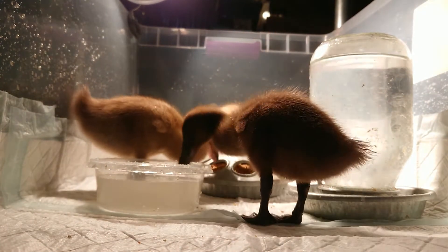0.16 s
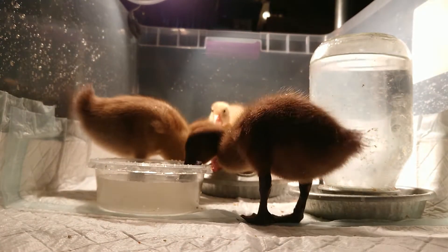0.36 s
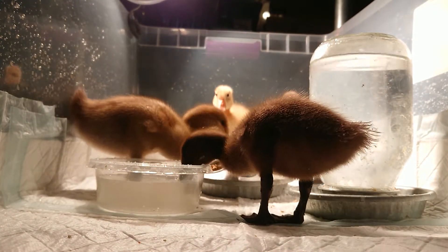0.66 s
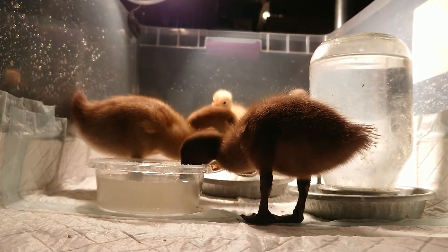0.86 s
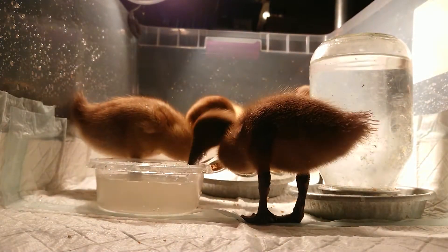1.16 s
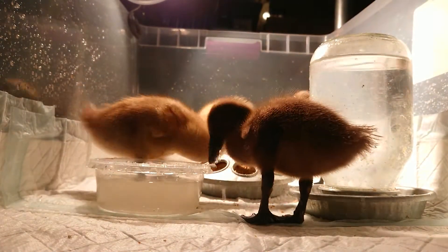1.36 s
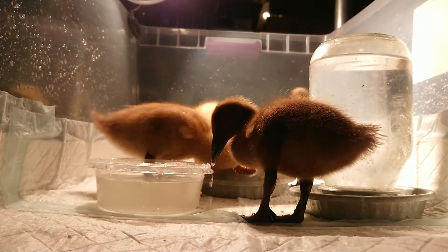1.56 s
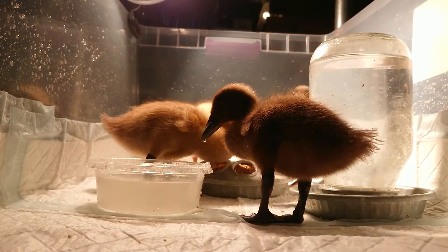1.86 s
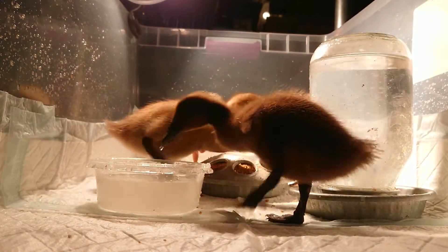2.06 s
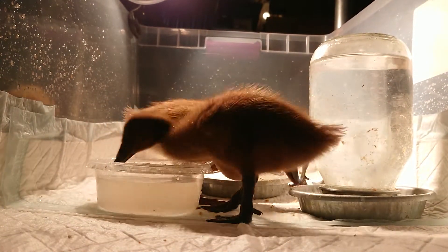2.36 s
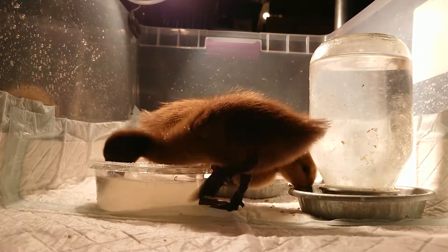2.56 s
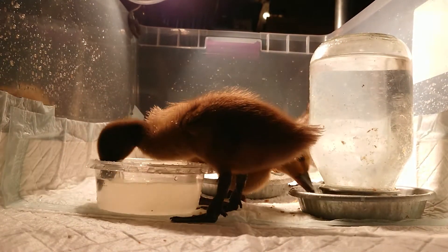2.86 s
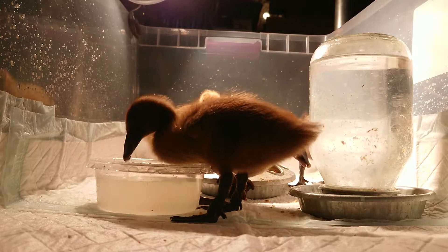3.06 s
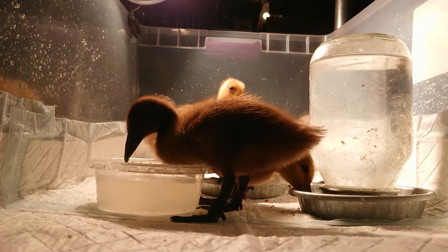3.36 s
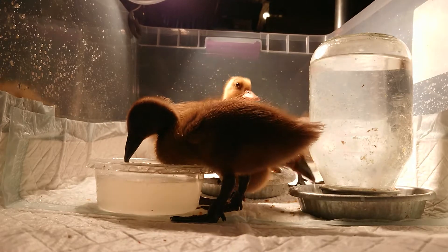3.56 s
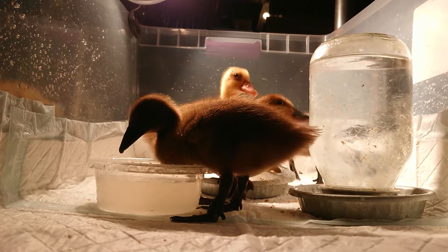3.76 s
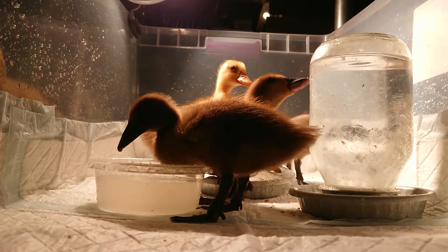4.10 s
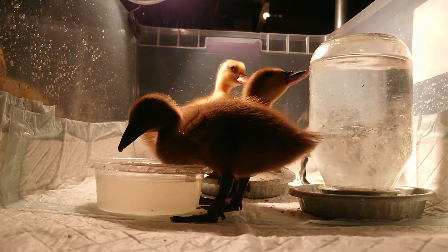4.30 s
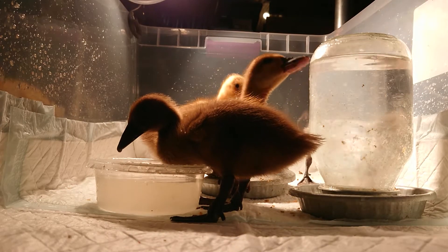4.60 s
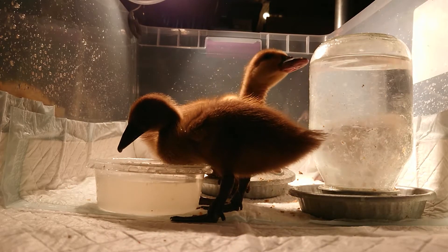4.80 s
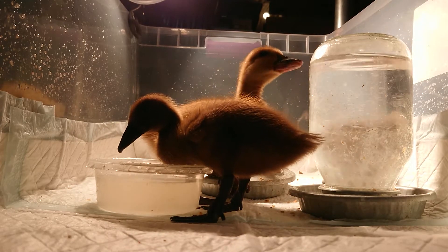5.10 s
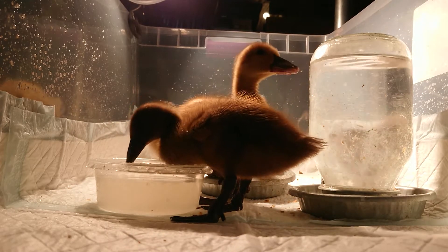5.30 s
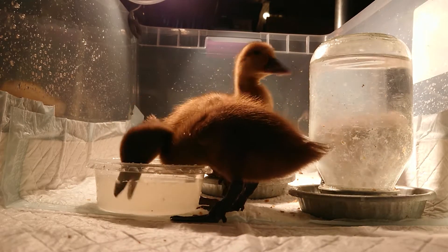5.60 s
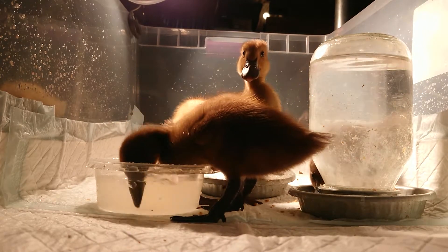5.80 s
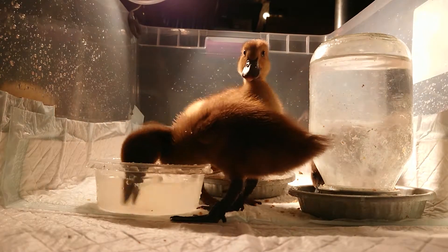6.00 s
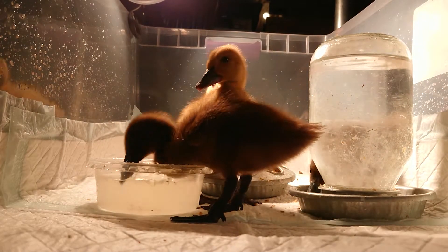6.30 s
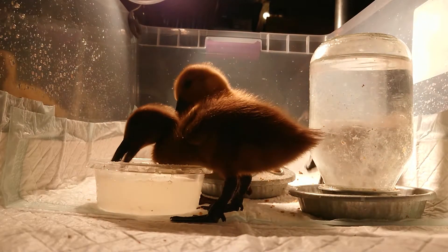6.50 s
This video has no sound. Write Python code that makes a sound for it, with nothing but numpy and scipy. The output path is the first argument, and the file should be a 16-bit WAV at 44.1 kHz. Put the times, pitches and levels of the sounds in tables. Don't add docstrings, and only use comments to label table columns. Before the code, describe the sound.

Ducklings peep brightly in a small plastic tub, the microphone on its floor. Brief arched whistles come in loose clusters from several birds, echoed tightly by the walls. Feet thump softly and rustle paper pads. A hard knock on the dish sounds early, then water ticks and light splashes; peeping continues over sparser movement until a bill dabbles loudly in water near the end.

```python
import sys
import numpy as np
from scipy import signal
from scipy.io import wavfile

SR = 44100
rng = np.random.default_rng(int(sys.argv[2]) if len(sys.argv) > 2 else 0)


def master_out(mix):
    frames = np.transpose(np.atleast_2d(mix))
    ceiling = np.clip(frames, -1, 1)
    pcm = np.round(ceiling * 32767).astype(np.int16)
    wavfile.write(sys.argv[1], SR, pcm)


def ratio_of_db(decibels):
    return 10 ** (np.asarray(decibels, float) / 20)


N = 293265


def seconds(length):
    return np.arange(round(length * SR)) / SR


def evened(x):
    return x / np.sqrt(np.mean(x ** 2) + 1e-20)


def smooth_chance(shape, size):
    return evened(signal.fftconvolve(rng.standard_normal(shape), np.ones(size), "same"))


def read(points, hz):
    f, value = np.transpose(points)
    return np.interp(np.log(hz + 1), np.log(f + 1), value)


def band(x, lo_hz, hi_hz, order=2):
    return signal.sosfilt(signal.butter(order, [lo_hz, hi_hz], "band", fs=SR, output="sos"), x)


def panned(pan_db):
    return ratio_of_db(np.array([pan_db / 2, -pan_db / 2]))


def add(mix, s, sound):
    part = mix[..., round(s * SR):][..., :sound.shape[-1]]
    part += sound[..., :part.shape[-1]]


def coloured(pair, shape, patchy_db, size):
    # frequency in Hz, left-right likeness from -1 to 1.
    likeness = [(60, 0.98), (180, 0.79), (550, 0.47), (1650, -0.35), (4970, -0.24), (15000, 0.0099)]
    # frequency in Hz, left minus right in dB.
    lean = [(60, -5.5), (150, -4), (380, -6.5), (950, -5.5), (2380, -1.5), (5980, -4), (15000, 6.5)]
    hz, _, (a, b) = signal.stft(pair, SR, nperseg=size)
    same = np.clip(read(likeness, hz), -1, 1)[:, None]
    z = np.array([a, same * a + np.sqrt(1 - same ** 2) * b])
    z *= ratio_of_db(read(shape, hz)[:, None] + patchy_db * smooth_chance(a.shape, size=(6, 5)))
    z *= panned(read(lean, hz))[:, :, None]
    return evened(signal.istft(z, SR, nperseg=size)[1][:, :N])


def tail(t60, start):
    t = seconds(.25)
    taps = rng.standard_normal((2, len(t))) * ratio_of_db(-60 * t / t60) * (t > start)
    return taps / np.linalg.norm(taps[0])


def bustle(axis):
    # middle in seconds, length in seconds, rustle in dB, floor tremor in dB.
    bouts = [(0.125, 0.36, -63, -49.5), (0.41, 0.12, -67, -46), (0.484, 0.11, -67, -40),
             (0.714, 0.5, -70.5, -52.5), (1.212, 0.2, -66.5, -51.5), (1.402, 0.15, -63, -47.5),
             (1.59, 0.32, -68, -41.5), (1.844, 0.086, -70, -52), (2.087, 0.095, -71, -56),
             (2.24, 0.35, -76, -52.5), (2.577, 0.2, -64, -43.5), (2.63, 0.1, -57.5, -51),
             (2.743, 0.23, -60.5, -45), (3.023, 0.31, -66.5, -59), (3.243, 0.038, -65, -45),
             (3.475, 0.29, -69, -47.5), (3.75, 0.22, -75, -50.5), (4.08, 0.11, -69.5, -43.5),
             (4.295, 0.06, -69.5, -73), (4.42, 0.095, -80, -47.5), (4.663, 0.071, -75, -47),
             (4.924, 0.19, -97, -49.5), (5.087, 0.22, -77.5, -57), (5.411, 0.25, -66, -47),
             (5.82, 0.25, -62, -47), (5.963, .12, -60.5, -49), (6.173, 0.2, -57, -51.5),
             (6.617, 0.39, -62, -48)]
    rest_db = (-85.5, -55.5)[axis]
    t, power = np.arange(0, N, 64) / SR, ratio_of_db(rest_db) ** 2
    for s, length, *db in bouts:
        power = power + ratio_of_db(db[axis]) ** 2 * np.exp(-(2 * (t - s) / length) ** 2 * 2.19)
    return np.interp(np.arange(N) / SR, t, np.sqrt(power))


def air():
    # frequency in Hz, level in dB per Hz.
    air_spectrum = [(150, -25.5), (250, -4.5), (292, -2), (482, -6), (544, -13), (681, -10), (1120, -9.5),
                    (1760, -7), (2250, -16.5), (3170, -20), (4640, -21.5), (6440, -28), (13100, -22.5),
                    (14500, -22), (15600, -36.5)]
    return ratio_of_db(-67) * coloured(rng.standard_normal((2, N)), air_spectrum, patchy_db=3.5, size=1024)


def pads():
    # frequency in Hz, rustle in dB per Hz.
    rustle_spectrum = [(530, -23), (900, -7.5), (1260, -5), (1980, 0.5), (2900, -2), (3900, -4),
                       (4240, -3.5), (5380, -9), (6440, -19), (9320, -22), (13200, -18.5), (15600, -32)]
    # frequency in Hz, tremor in dB per Hz.
    tremor_spectrum = [(24, -51), (40, 6), (108, 7), (333, -18), (371, -18), (483, -14), (531, -22.5),
                       (614, -14.5), (700, -14), (910, -34), (1540, -120)]
    snaps_per_s = 3200
    clumps = ratio_of_db(2.8 * smooth_chance(N, size=500))
    snaps = ratio_of_db(3.1 * np.minimum(rng.exponential(1, (2, N)), 5))
    snaps *= rng.random((2, N)) < snaps_per_s / SR
    fibres = evened(snaps * rng.choice([-1, 1], (2, N)))
    fibres = (fibres + 0.88 * rng.standard_normal((2, N))) * clumps
    rustle = coloured(fibres, rustle_spectrum, patchy_db=4., size=256)
    lumps = ratio_of_db(2.5 * smooth_chance(N, size=1200))
    tremor = coloured(rng.standard_normal((2, N)) * lumps, tremor_spectrum, patchy_db=2., size=4096)
    return rustle * ratio_of_db(10.5) * bustle(axis=0) + tremor * ratio_of_db(1.5) * bustle(axis=1)


def droplets():
    out, t = np.zeros((2, N)), seconds(.03)
    drops_per_s = 400
    size = ratio_of_db(3.9 * np.minimum(rng.exponential(1, N), 3)) * (rng.random(N) < drops_per_s / SR)
    kind = rng.integers(0, 16, N)
    for k, hz in enumerate(np.geomspace(1300., 5200., num=16)):
        ring = np.sin(2 * np.pi * hz * t * (1 + 2.5 * t))
        drop = ring * np.exp(-hz * t / 9.) * (1 - np.exp(-t / .0007))
        place = panned(rng.uniform(-9.0, 6.6))[:, None]
        out += place * signal.oaconvolve(size * (kind == k), drop)[:N]
    return evened(out) * ratio_of_db(-5.0) * bustle(axis=0)


def wet_ticks():
    # start in seconds, peak in dB, pitch in Hz.
    tick_events = [(.318, -54, 3600), (.697, -34.5, 3160), (.901, -51, 4280), (1.268, -38, 3080),
                   (1.225, -42, 3580), (5.712, -37.5, 3620), (2.511, -47, 1800), (2.5516, -43.5, 4220),
                   (2.578, -40, 3600), (2.597, -45, 4600), (2.6209, -41, 3200), (2.638, -36, 4570),
                   (2.655, -37, 2700), (2.6893, -48, 3690), (2.7028, -43, 3300), (2.737, -36, 1710),
                   (2.754, -44, 4300), (2.7716, -42.5, 3020), (2.801, -46, 5300), (2.872, -34, 3860),
                   (3.492, -42, 3500), (5.7826, -40.5, 1640), (5.838, -48.5, 5900), (5.9383, -50, 4200),
                   (6.027, -39, 4700), (6.081, -36, 1670), (6.087, -36, 2380), (6.141, -29.5, 4730),
                   (6.1695, -32, 2160), (6.204, -32, 4210), (6.212, -35, 3090), (6.2503, -41.5, 2940)]
    t60, spread = 0.024, 0.156
    out, t = np.zeros(N), seconds(.04)
    for chance, (s, db, hz) in zip(rng.uniform(-1, 1, (len(tick_events), 3)), tick_events):
        notes = hz * (1 + spread * np.array([0, -1, 1.3]) * (1 + 0.41 * chance))
        ring = np.sin(2 * np.pi * notes[:, None] * t).sum(0)
        add(out, s, ratio_of_db(db - 6.0 - 60 * t / t60) * ring * np.minimum(t / 0.00069, 1))
    echoes = signal.oaconvolve(out[None], tail(t60=0.045, start=0.0018), axes=1)[:, :N]
    return out * panned(-2.2)[:, None] + ratio_of_db(-5.0) * echoes


def jar():
    # start in seconds, peak in dB.
    jar_taps = [
        (2.495, -44),
        (2.7851, -47),
        (3.357, -50.5),
        (3.382, -55),
    ]
    # start in seconds, peak in dB, pitch in Hz.
    pings = [
        (1.2, -45.5, 3520),
        (2.456, -55, 3560),
        (3.506, -50, 4300),
        (3.762, -56, 3650),
    ]
    jar_hz = 1870
    out, t = np.zeros(N), seconds(.2)
    for s, db in jar_taps:
        add(out, s, ratio_of_db(db - 60 * t / 0.093) * np.sin(2 * np.pi * jar_hz * t) * np.minimum(t / 0.0017, 1))
    for s, db, hz in pings:
        add(out, s, ratio_of_db(db - 60 * t / 0.044) * np.sin(2 * np.pi * hz * t) * np.minimum(t / 0.00082, 1))
    return out


def clicks():
    # start in seconds, peak
    # in dB, t60 in seconds.
    bill_clicks = [(.16, -62, .098), (0.2, -37.5, 0.048), (0.699, -46.5, 0.06), (1.268, -38.5, 0.039),
                   (1.4657, -43, 0.1), (2.707, -43, 0.12), (2.719, -41, 0.12), (2.853, -45, 0.11),
                   (2.8649, -36, 0.11), (2.9058, -40.5, 0.055), (3.9752, -52, 0.061), (4.1372, -50, 0.096),
                   (4.208, -50, .044), (5.553, -50, 0.39), (6.0123, -34.5, 0.12), (6.134, -25.5, 0.061),
                   (6.3247, -36.5, 0.071), (6.4676, -47, 0.21), (6.5172, -38, 0.049), (6.614, -38.5, 0.083),
                   (6.463, -58, 0.041)]
    # start in seconds, peak in
    # dB.
    pad_snaps = [(0.435, -39), (0.4797, -51), (0.498, -30), (1.222, -42), (2.0918, -45.5), (2.508, -53),
                 (2.799, -58), (3.4195, -41.5), (3.7913, -57.5), (4.2373, -52), (4.8376, -54.5),
                 (4.9746, -57), (5.2603, -55.5), (5.318, -42.5), (5.3524, -43.5), (5.4782, -44.5),
                 (5.7108, -43.5), (5.8745, -37.5), (6.0808, -41.5), (6.1703, -37), (6.397, -43),
                 (6.579, -52)]
    # start in seconds, peak
    # in dB, part above 6 kHz in dB relative to the peak.
    splashes = [(1.158, -66, -23), (1.546, -39.5, -18), (1.5826, -37.5, -19.5), (1.7416, -53.5, -22),
                (2.0187, -51.5, -20), (2.1332, -39.5, -13.5), (2.3103, -47, -17), (2.391, -40, -10),
                (2.5503, -54, 5), (2.6227, -39, -11), (3.48, -43.5, -12), (4.6462, -49, -8),
                (5.382, -42, -12.5), (6.1948, -32.5, -11.5)]
    hits = [(s, db, -26, t60) for s, db, t60 in bill_clicks]
    hits += [(s, db, bright_db, 0.12) for s, db, bright_db in splashes]
    hits += [(s, db, -15.5, 0.054) for s, db in pad_snaps]
    strength, ticks, t = np.zeros((2, N)), np.zeros((2, N)), seconds(.14)
    for s, db, bright_db, t60 in hits:
        decay = ratio_of_db(-60 * t / max(t60, .01)) + ratio_of_db(-14.5 - 60 * t / 0.011)
        add(strength, s, ratio_of_db([[db - 4.5], [db + bright_db - 8.0]]) * decay)
        add(ticks, s, ratio_of_db([[db + 12.5], [db + bright_db - 17]]))
    noise = rng.standard_normal((3, N)) * ratio_of_db(1.26 * smooth_chance(N, size=130))
    noise = noise[0] + 2.0 * noise[1:]
    body = band(noise * strength[0] + ticks[0], 1460, 4890, order=4) * panned(-2.8)[:, None]
    bright = band(noise * strength[1] + ticks[1], 6200, 15000) * panned(2.0)[:, None]
    return body + bright


def knocks():
    # start in seconds, thud peak in dB, dish pitch in Hz, floor pitch in Hz,
    # rattle in dB.
    footfalls = [(.418, -39.5, 259, 120, -7.5), (.737, -50, 336, 151, -13), (1.261, -37.5, 195, 125, -24.5),
                 (1.367, -44, 253, 110, -24), (1.506, -36.5, 110, 92, -28), (1.592, -35, 230, 109, -26),
                 (1.647, -34, 198, 144.6, -22), (5.763, -41.5, 190, 165, -25), (2.101, -46, 254, 120, -15),
                 (2.424, -47.5, 287, 135, -11), (2.553, -48, 363, 110, -17), (2.635, -45, 266, 113, -17),
                 (2.73, -45.5, 253, 108, -18), (3.549, -39.5, 277, 193, -17),
                 (3.727, -46.5, 245, 110, -17.5), (3.903, -46, 430, 160, -17),
                 (4.036, -43.5, 252, 112, -13.5), (4.365, -48.5, 220, 139.6, -11.5),
                 (4.812, -43.5, 252, 116, -16), (5.152, -38.5, 415, 112, -20), (5.743, -30, 170, 149, -17),
                 (6.584, -46, 287, 110, -21)]
    # start in seconds, peak in dB, dish pitch in Hz.
    dish_knocks = [(.203, -52, 656), (.365, -50.5, 483), (.477, -45, 378), (1.454, -36.5, 614),
                   (1.462, -37, 640), (1.476, -44, 626), (1.489, -49, 654), (1.607, -43, 660),
                   (1.569, -21, 617), (1.648, -33, 324), (1.652, -39, 930), (1.739, -46, 325),
                   (2.49, -33.5, 713), (2.782, -47.5, 610), (3.242, -44, 450), (3.357, -38.5, 673),
                   (4.287, -40.5, 563), (4.718, -43, 668), (4.888, -34.5, 344), (5.318, -54, 343),
                   (5.356, -44, 475), (5.426, -26.5, 435), (5.873, -47, 480), (5.936, -45, 672),
                   (6.056, -36, 439), (6.395, -53.5, 410)]
    # start in seconds, peak in dB, pitch in Hz.
    rim_taps = [
        (2.947, -56, 456),
        (4.161, -39, 543),
        (6.13, -48, 330),
    ]
    step_ring_db = -1.5
    rim_hz, rim_db, rim_t60 = 628, -20, .16

    blows = [(s, db + step_ring_db, hz, -step_ring_db, low_hz, rattle_db)
             for s, db, hz, low_hz, rattle_db in footfalls]
    blows += [(s, db, hz, -26, 135, -9.5) for s, db, hz in rim_taps]
    blows += [(s, db, hz, -42 + .55 * (db + 33.5) - db, 140, -11.5) for s, db, hz in dish_knocks]

    out, t = np.zeros((2, N)), seconds(.16)
    grit = evened(band(rng.standard_normal((2, N + len(t))), 227, 833))
    shake = evened(band(rng.standard_normal(N + len(t)), 49.4, 250))
    soft = 1 - np.exp(-t / 0.0034)
    for s, db, hz, thud_db, low_hz, rattle_db in blows:
        now = slice(round(s * SR), round(s * SR) + len(t))
        dish = np.sin(2 * np.pi * hz * t) * ratio_of_db(-60 * t / 0.038)
        ring_db = rim_db - 5.2 * abs(np.log2(hz / rim_hz))
        dish = dish + np.sin(2 * np.pi * rim_hz * t) * ratio_of_db(ring_db - 60 * t / rim_t60)
        rattle = grit[:, now] * ratio_of_db(rattle_db - 60 * t / 0.11)
        floor = 1.23 * np.sin(2 * np.pi * low_hz * t) * ratio_of_db(-60 * t / 0.07) * (1 - np.exp(-t / 0.0033))
        thud = (floor + 0.26 * shake[now] * ratio_of_db(-60 * t / 0.13)) * ratio_of_db(thud_db + 4.5)
        blow = (dish + rattle) * panned(-8.5)[:, None] + thud * panned(-4.5)[:, None]
        add(out, s - .003, ratio_of_db(db + 5.5) * soft * blow)
    return out


def peep(chance, near, manner, length, first_hz, top_hz, last_hz, db, crest):
    # frequency in Hz, gain in dB.
    tub_colour = [(1500, -8.5), (2500, 0), (2800, -4.5), (2950, 8), (3150, -5), (3500, 4.5), (5500, -10.5),
                  (6200, -29.5), (6750, -14.5), (8000, -20)]
    # share of the peep, level in dB.
    effort = [(0, -0.5), (.14, 3.5), (.24, 4.5), (.33, 9), (.43, 2.5), (.6, 2), (.85, -1.5), (1, -7.5)]
    fold_gap_hz, flutter_depth_db = 480, 2.8
    late, fold_db, early, hook, soft_db, swell_db, accent = manner
    hook, crest = np.clip(hook, 0, .6), np.clip(crest, .1, .95)

    u = np.linspace(0, 1, round(length * SR))
    before = np.maximum(1 - u / crest, 0)
    after = np.maximum((u - crest) / (1 - crest), 0)
    rise = (top_hz - first_hz) * before ** early
    drop = (top_hz - last_hz) * after ** late * (1 - hook * after) / (1 - hook)
    hz = top_hz - rise - drop

    phase, speed = chance
    cycles = phase[:, None] + (60 + 90 * speed[:, None]) * u * length
    wobble, flutter = (1 - near) * np.sin(2 * np.pi * cycles)
    turn = 2 * np.pi * np.cumsum(hz * (1 + 0.03 * wobble)) / SR
    tone = ratio_of_db((1 - near) * read(tub_colour, hz)) * np.sin(turn)
    tone = tone + ratio_of_db(read(tub_colour, 2 * hz) - 33 + 16.0 * near) * np.sin(2 * turn)
    beat = 2 * np.pi * fold_gap_hz * u * length * (1 + .2 * (speed[0] - .5))
    tone = tone + ratio_of_db(fold_db - 60 * (u - crest) ** 2) * np.sin(turn + beat)

    effort_db = accent * np.interp(u, *np.transpose(effort)) + flutter_depth_db * (flutter + wobble)
    effort_db = effort_db + swell_db * (u - .4) + soft_db * before ** 2
    return ratio_of_db(db + 2 + effort_db) * tone * signal.windows.tukey(len(u), .15)


def bird(peeps, pan_db, near, *manner):
    # delay in seconds, left in dB, right in dB.
    walls = [(.0011, -8, -26), (.0023, -3, -9.5), (.0037, -17, -8), (.0052, -3, -13.5),
             (.0071, -19.5, -7.5), (.0096, -10.5, -22)]
    voice, near = np.zeros(N), np.clip(near, 0, 1)
    for chance, (s, *shape) in zip(rng.random((len(peeps), 2, 2)), peeps):
        add(voice, s, peep(chance, near, manner, *shape))
    out, thrown = np.array([voice, voice]), voice * ratio_of_db(-6. * near)
    for delay, left_db, right_db in walls:
        add(out[0], delay, ratio_of_db(left_db + 5.0) * thrown)
        add(out[1], delay, -ratio_of_db(right_db + 2.5) * thrown)
    out += ratio_of_db(-7.5) * signal.oaconvolve(thrown[None], tail(t60=0.13, start=0.0084), axes=1)[:, :N]
    return out * panned(pan_db)[:, None]


def arches(peeps, first_hz, last_hz):
    return [(s, length, first_hz, top_hz, last_hz, db, crest) for s, length, top_hz, db, crest in peeps]


def ducklings():
    # start in seconds, length in seconds, top in Hz, level in dB, crest as share of the peep.
    near_peeps = [(3.41, .074, 2660, -46.5, 0.62), (3.497, 0.068, 3054, -44, 0.64),
                  (3.612, .057, 3350, -43, 0.58), (3.967, 0.068, 2753, -47.5, 0.59),
                  (4.07, 0.074, 3230, -44.5, 0.56), (4.205, 0.06, 3380, -43.5, 0.57),
                  (4.717, 0.065, 2670, -48, .5), (4.833, .067, 3070, -46, 0.58),
                  (4.972, 0.062, 3240, -43.5, .6), (5.432, .047, 2616, -43.5, 0.49),
                  (5.549, 0.059, 3200, -41.5, 0.56), (6.099, 0.0542, 2775, -42, .52)]
    back_peeps = [(.041, 0.049, 2960, -42.5, 0.7), (.144, 0.061, 3412, -42, 0.57),
                  (.474, 0.063, 2860, -40, .62), (.599, 0.068, 3078, -38.5, 0.58),
                  (.733, 0.066, 3157, -35.5, 0.58), (1.298, 0.046, 2786, -41.5, .55),
                  (1.675, .05, 2545, -46, 0.54), (1.78, 0.05, 3090, -44.5, 0.69),
                  (2.244, 0.06, 3200, -45, 0.64), (2.852, 0.0223, 2690, -53, 0.82),
                  (2.952, 0.059, 2765, -41, 0.57), (4.42, 0.042, 2435, -59.5, 0.52),
                  (5.92, 0.076, 2290, -53, 0.65)]
    deep_peeps = [
        (1.168, 0.052, 2288, -52.5, 0.54),
        (2.009, 0.047, 2600, -50, 0.69),
        (2.124, .074, 2650, -50.5, 0.57),
        (3.062, 0.057, 2893, -44, 0.59),
        (5.147, .074, 3197, -56.5, .42),
        (5.224, 0.059, 3620, -51, 0.68),
        (5.354, .051, 3530, -49, 0.64),
    ]
    sharp_peeps = [
        (6.463, .05, 3427, -45, .7),
        (6.561, 0.0436, 2950, -48, .7),
        (6.642, .03, 2910, -47, .7),
    ]
    # start in seconds, length in seconds, first, top and
    # last pitch in Hz, level in dB, crest as share of the peep.
    sighs = [
        (0.154, 0.043, 3800, 4480, 3970, -56.5, 0.48),
        (.208, 0.036, 1870, 2036, 1690, -51.5, .5),
        (1.953, 0.046, 2180, 2230, 1330, -55, .15),
        (2.296, 0.069, 1990, 2795, 1935, -48, 0.44),
        (3.485, 0.013, 2050, 2090, 2050, -56, .45),
        (5.952, 0.023, 4540, 4750, 4450, -56.5, .5),
    ]
    # start in seconds, length in seconds, # nominal first pitch
    # in Hz (sounds about 350 Hz lower), nominal top in Hz (not quite reached), level in dB.
    cut_peeps = [(0.086, 0.034, 1850, 2615, -46.5), (0.242, 0.023, 2320, 2887, -40),
                 (1.325, 0.056, 2264, 3270, -53), (1.825, 0.039, 1450, 2730, -53),
                 (2.292, 0.058, 2140, 3420, -60), (3.016, .039, 1950, 3340, -47.5),
                 (4.299, 0.032, 1680, 3240, -50.5), (5.053, 0.038, 1540, 3220, -51),
                 (5.801, 0.029, 1630, 3130, -55), (6.022, 0.024, 1880, 3200, -51.5),
                 (6.075, 0.019, 1580, 2450, -47.5)]
    # left minus right in dB, nearness 0-1, lateness of the drop, #
    # second fold in dB, steepness of the start, hook at the end (held to 0-.6), soft start in dB, swell in dB,
    # # share of the effort accent.
    near_place = (-11, 0.9, 2.5, -26, 2, 0.48, -1, 3, 0.84)
    back_place = (-5, 0.43, 3.5, -23, 2.5, 0.55, -4, 2.5, 1.23)
    deep_place = (-9.5, 0.37, 2, -30, 1.8, 1.1, -1.5, -1.7, 1.04)
    cut_place = (-8.5, 0.9, 0, -16, 1.8, 2, 3.8, 3.5, .9)
    sharp_place = (-5.5, 0.7, 1.5, -22, 2.7, .1, -.2, -21.5, 0.2)

    shortfall_hz, cut_crest = 140, .75
    cut = [(s, length, first_hz, top_hz, top_hz - shortfall_hz, db, cut_crest)
           for s, length, first_hz, top_hz, db in cut_peeps]
    out = bird(arches(near_peeps, first_hz=1950, last_hz=2000), *near_place)
    out += bird(arches(back_peeps, first_hz=1780, last_hz=1830), *back_place)
    out += bird(arches(deep_peeps, first_hz=1560, last_hz=1600) + sighs, *deep_place)
    out += bird(cut, *cut_place)
    out += bird(arches(sharp_peeps, first_hz=1900, last_hz=2900), *sharp_place)
    return out


def scene():
    water = droplets() + wet_ticks()
    return air() + pads() + water + jar() + clicks() + knocks() + ducklings()


def band_limit(x):
    return signal.sosfilt(signal.butter(12, 15340, fs=SR, output="sos"), x)


def record(dry):
    return band_limit(band(dry, 42, 15000, order=5))


dry = scene()
out = record(dry)
master_out(out)
```